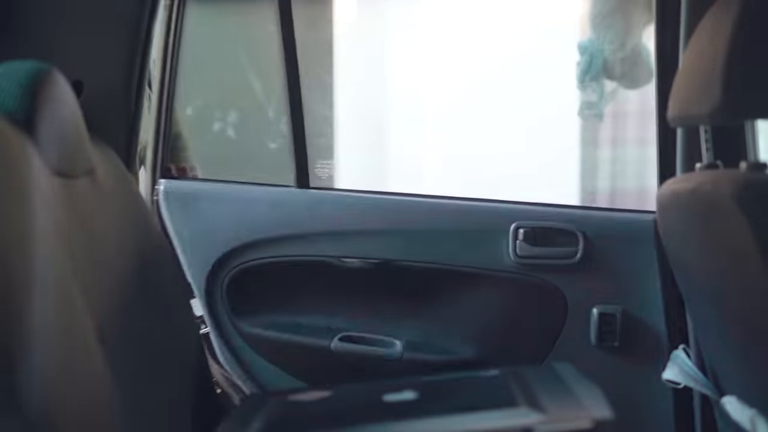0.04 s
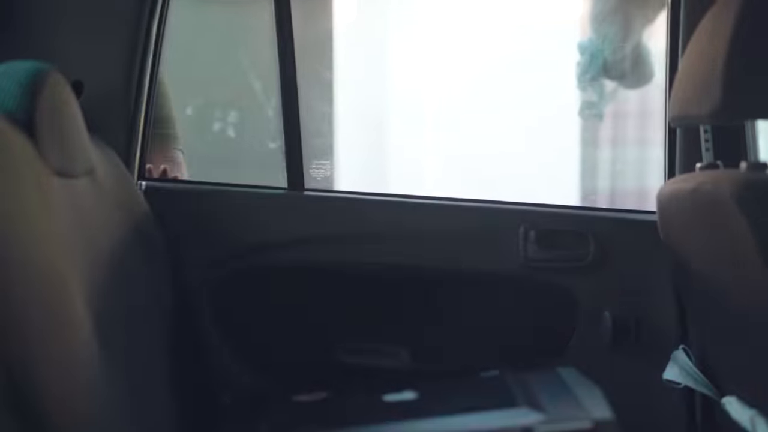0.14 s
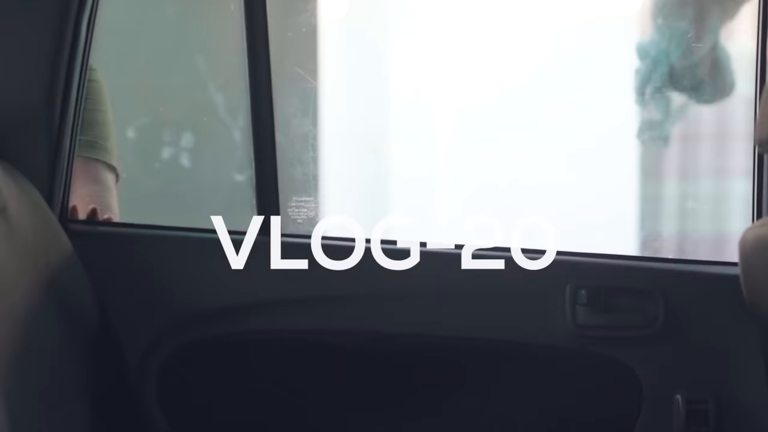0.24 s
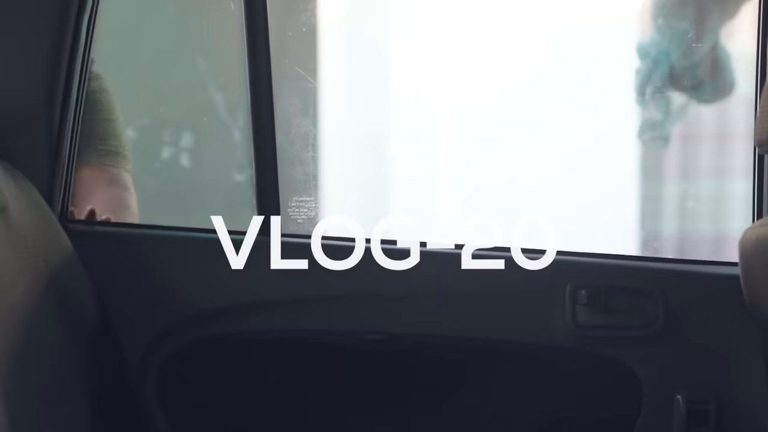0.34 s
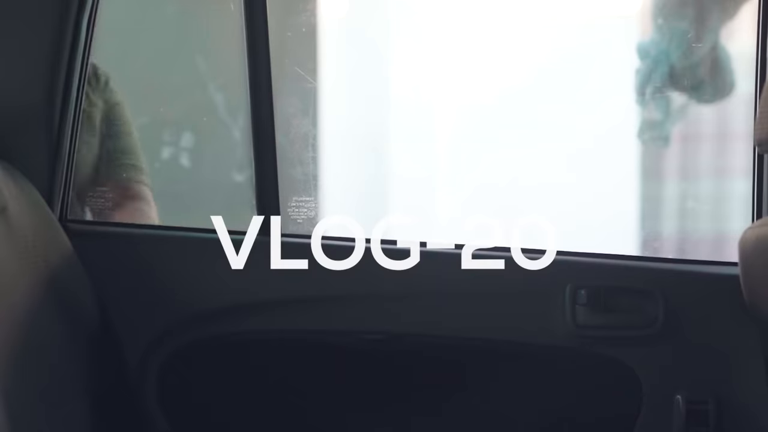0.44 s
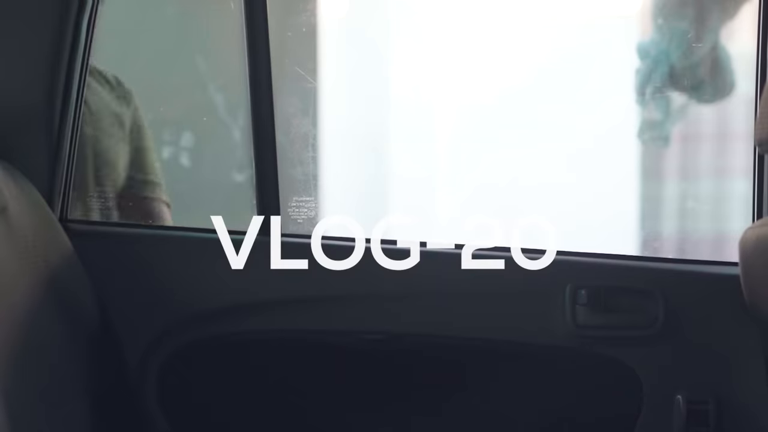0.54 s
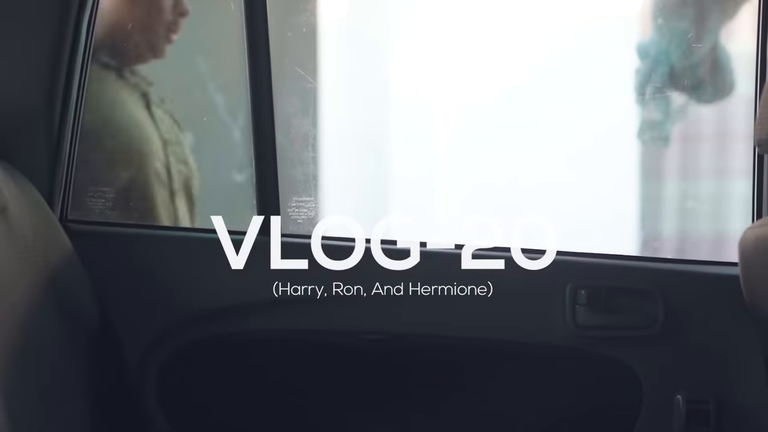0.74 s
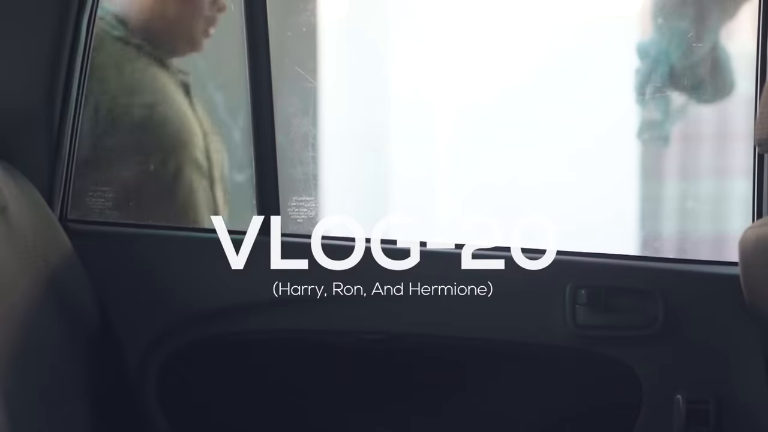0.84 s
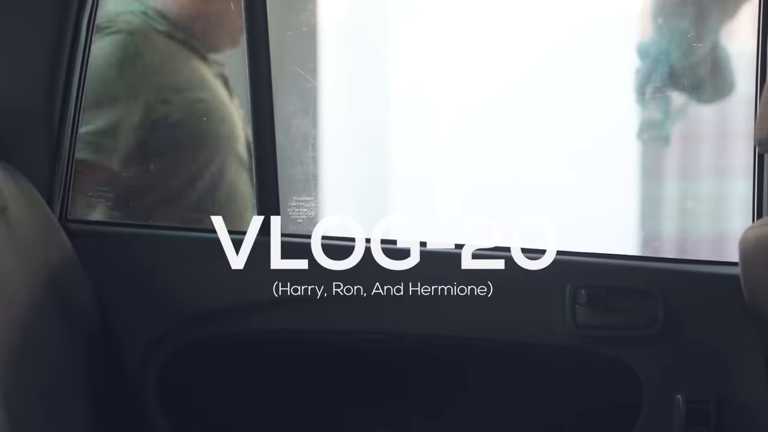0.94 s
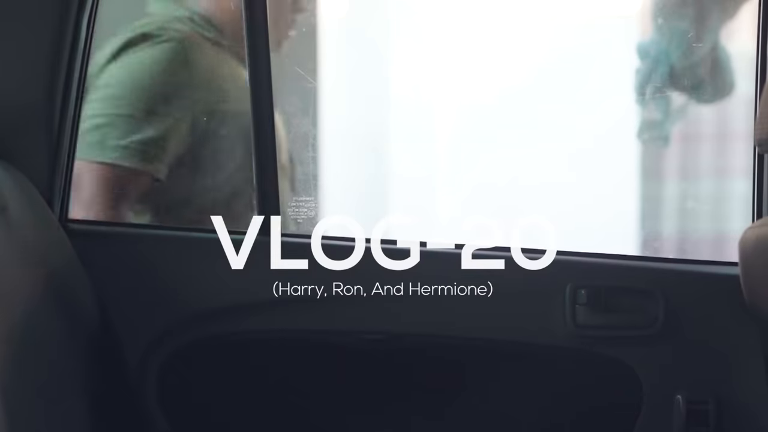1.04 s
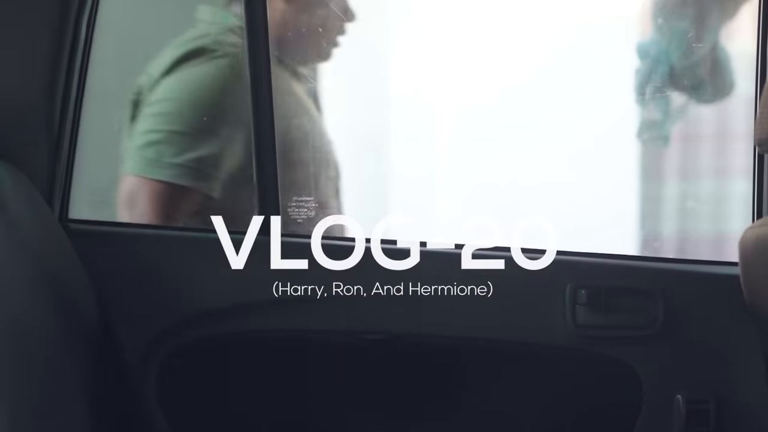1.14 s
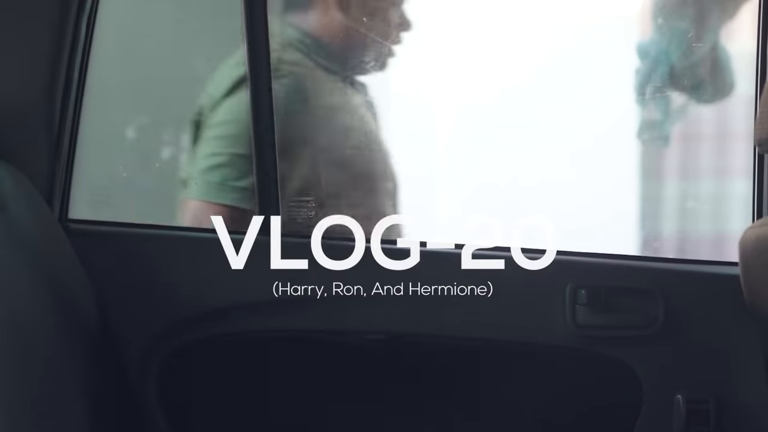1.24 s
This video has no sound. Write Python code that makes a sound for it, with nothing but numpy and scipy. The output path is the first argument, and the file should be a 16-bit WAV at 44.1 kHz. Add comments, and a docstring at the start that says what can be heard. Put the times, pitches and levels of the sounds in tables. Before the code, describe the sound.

One solid car door thud, with a metallic latch click and a short echo, is picked up by a microphone inside the cabin. Distant traffic hums quietly underneath, and a faint bird calls near the end.

```python
"""The back seat of a car parked between echoing walls, stereo microphone inside the cabin.
Close by, a rear door is pushed shut: the latch clacks, the door lands on its seal,
the panels and cabin air boom, and the walls return the slam.
Distant traffic murmurs throughout and a small bird calls near the end."""
import sys
import numpy as np
from scipy import signal
from scipy.fft import rfft, irfft
from scipy.io import wavfile
from scipy.ndimage import uniform_filter1d

SR = 44100
rng = np.random.default_rng(int(sys.argv[2]) if len(sys.argv) > 2 else 0)


def put_to_file(sound):
    """Save the sound as 16-bit audio at rate SR, in the file named by the first command-line argument."""
    columns = np.atleast_2d(sound).T  # one column per channel
    safe = np.clip(columns, -1, 1)
    whole_steps = np.round(safe * 32767)
    wavfile.write(sys.argv[1], SR, whole_steps.astype(np.int16))


N = 57330
T = np.arange(N) / SR
HZ = np.fft.rfftfreq(N, 1 / SR)


def amp(db):
    """Decibels to gain."""
    return 10 ** (np.asarray(db) / 20)


def unit_rms(x):
    """Scales to rms 1."""
    return x / np.sqrt(np.mean(x ** 2) + 1e-20)


def curve(points, hz):
    """Interpolates (Hz, value) points on a log-frequency axis."""
    point_hz, value = np.transpose(points)
    return np.interp(np.log(hz + 1), np.log(point_hz + 1), value)


def noise(colour, tilt=0):
    """Stereo noise, centred in the bass, diffuse in the treble; tilt is dB per octave above about 1 kHz."""
    # Each row: frequency in Hz, correlation between left and right.
    likeness = [(30, 1), (70, 1), (125, 1), (250, 1), (500, 0.57), (1000, 0.64), (2000, 0.11), (16000, 0)]
    same = np.clip(curve(likeness, HZ), -1, 1)
    mid, side = np.exp(2j * np.pi * rng.random((2, len(HZ))))
    mid, side = mid * np.sqrt(1 + same), side * np.sqrt(1 - same)
    gain = amp(curve(colour, HZ) + tilt * np.log2(1 + HZ / 1000))
    return unit_rms(irfft(np.array([mid + side, mid - side]) * gain, N))


def envelope(start, rise, t60):
    """A straight rise and an exponential decay, all times in seconds."""
    age = np.maximum(T - start, 0)
    return np.minimum(age / rise, 1) * np.exp(-np.log(1000) * age / t60)


def mode(start, hz, db, t60, rise, phase=0):
    """One struck resonance: a decaying sine."""
    return amp(db) * envelope(start, rise, t60) * np.sin(2 * np.pi * hz * (T - start) + phase)


def traffic():
    """Far-off traffic: a murmur and a rumble that recede, and a steady narrow drone."""
    # Each row of these three spectra: frequency in Hz, relative level in dB.
    murmur_colour = [(15, -38), (25, -1.5), (53, -4), (92, -2.5), (200, -3), (301, -18.5), (714, -6),
                     (936, -15.5), (1020, -16), (1190, -12.5), (2160, -20.5), (3080, -24), (5140, -31.5),
                     (5730, -29.5), (7310, -32.5), (8360, -32), (16000, -42)]
    rumble_colour = [(20, -23), (60, -24), (90, -0.5), (170, 1), (250, -6), (400, -10), (1000, -19),
                     (16000, -68)]
    drone_colour = [(20, -60), (560, -27), (690, -3.5), (745, 1), (790, -6), (900, -35), (16000, -90)]
    murmur_fade_db_per_s, rumble_fade_db_per_s = 2.5, 7
    murmur = amp(-42.5 - murmur_fade_db_per_s * T) * noise(murmur_colour)
    drone = amp(-53.5) * noise(drone_colour)
    rumble = amp(-43 - rumble_fade_db_per_s * T) * noise(rumble_colour)
    return murmur + drone + rumble


def faint_ring():
    """A faint high ring dies away at the start."""
    # Each row: frequency in Hz, relative level in dB.
    colour = [(20, -58.5), (5000, -21), (5800, -7), (6200, -21), (6700, -8.5), (7400, -20), (16000, -31)]
    return amp(-52) * noise(colour) * envelope(0, rise=0.0012, t60=1)


def latch():
    """The latch meets the striker, and the lock's small steel parts ring, ping and click."""
    # Each row: start in seconds, level in dB.
    strikes = [(0.2287, -32), (0.2353, -15)]
    # Each row: frequency in Hz, relative level in dB, t60 in seconds.
    latch_modes = [(1160, -1.5, 0.11), (1297, -3, 0.15), (1300, 0.5, 0.045), (2085, -5, 0.12),
                   (3805, -3.5, 0.035)]
    # Each row: start in seconds, frequency in Hz, level in dB.
    pings = [(.2512, 7660, -22), (.2768, 3800, -17), (.2915, 3650, -26)]
    # Each row: start in seconds, level before the low-pass in dB, treble tilt in dB per octave,
    # t60 in seconds, low-pass edge in Hz.
    clicks = [(0.2288, -23, -4, 0.14, 9400), (0.236, -21.5, -4, 0.3, 7300), (0.2473, -23, -8, 0.17, 18500),
              (0.25, -28, 9, 0.087, 17800), (0.2764, -19.5, -5, 0.2, 8550)]
    # Each row: frequency in Hz, relative level in dB.
    click_colour = [(100, -16), (500, -8), (1200, -11), (2500, -8), (5000, -13.5), (6800, -12), (7600, -14),
                    (9000, -12), (12000, -18), (16000, -17.5)]
    rise_s, left_delay_s = 0.0018, 0.00015
    ring = sum(mode(start, hz, db + mode_db, t60, rise=0.0015)
               for start, db in strikes for hz, mode_db, t60 in latch_modes)
    ring += sum(mode(start, hz, db, t60=0.028, rise=rise_s) for start, hz, db in pings)
    out = np.array([np.interp(T - left_delay_s, T, ring), ring])
    for start, db, tilt, t60, edge_hz in clicks:
        lowpass = signal.butter(4, edge_hz, fs=SR, output="sos")
        out += amp(db) * signal.sosfilt(lowpass, noise(click_colour, tilt)) * envelope(start, rise_s, t60)
    return out


def door_skin():
    """The sheet metal gives a short hollow knock as the door lands."""
    # Each row: frequency in Hz, relative level in dB, t60 in seconds.
    skin_modes = [(427.3, -2.5, 0.31), (551.4, -3, 0.45), (794, -1, 0.2), (927, 0.5, 0.14),
                  (1148, -4.5, 0.13)]
    start_s, level_db = 0.247, -23
    return sum(mode(start_s, hz, level_db + db, t60, rise=0.0022, phase=2 * np.pi * rng.random())
               for hz, db, t60 in skin_modes)


def seal_thud():
    """The door settles on its seal; each blow shakes many close modes, each band dying at its own speed."""
    # Each row: start in seconds, level in dB, rise in seconds, treble tilt in dB per octave.
    blows = [(0.2498, -14.5, 0.0062, -1.5), (0.271, -17, 0.013, 0), (0.3, -20.5, 0.0095, -6)]
    # Each row: frequency in Hz, relative level in dB.
    colour = [(20, -7), (45, -19), (80, -11.5), (170, 1), (260, 0), (350, -4.5), (540, -5.5), (670, -12),
              (850, -10.5), (1300, -10.5), (2100, -14.5), (3000, -22), (6500, -26.5), (10000, -31.5),
              (16000, -39)]
    # Each row: frequency in Hz, t60 in seconds.
    decay = [(40, 1.8), (170, 1.1), (400, 0.78), (800, 0.54), (2000, 0.86), (5000, 0.7), (14000, 0.4)]
    centres_hz = np.geomspace(40, 14000, 10)
    # Overlapping triangular bands that sum to one.
    bands = [curve(np.c_[centres_hz, peak], HZ) for peak in np.eye(len(centres_hz))]
    out = np.zeros((2, N))
    for start, db, rise, tilt in blows:
        shake = rfft(noise(colour, tilt))
        for hz, band in zip(centres_hz, bands):
            out += amp(db) * irfft(shake * band, N) * envelope(start, rise, curve(decay, hz))
    return out


def cabin_boom():
    """The trapped air is squeezed and sways; standing waves of panels and cabin swell over it."""
    # Each row: start in seconds, frequency in Hz, level in dB, t60 in seconds.
    air_modes = [(0.253, 41.6, -21.5, 0.85), (0.26, 62.6, -22.5, 0.9)]
    # Each row: frequency in Hz, relative level in dB, t60 in seconds.
    body_modes = [(106.9, -6, 0.42), (125.9, -3.5, 0.44), (157.1, 4, 0.47), (182.9, -2.5, 0.36),
                  (202.9, -1, 0.64), (250, -4.5, 1.106), (318.7, -6, 0.69), (374.4, -7.5, 0.66),
                  (438.3, -17, 0.53), (473, -4, 0.38), (543.3, -10, 0.68), (799, -13, 0.66),
                  (950, -17, 0.22)]
    start_s, level_db, spread_rad = 0.277, -12.5, 0.5
    out = sum(mode(start, hz, db, t60, rise=0.0057) for start, hz, db, t60 in air_modes)
    sides = spread_rad * np.array([[-1], [1]])
    for k, (hz, db, t60) in enumerate(body_modes):
        phase = sides * (-1) ** k + 2 * np.pi * rng.random()  # the leading side alternates by mode
        out = out + mode(start_s, hz, level_db + db, t60, rise=0.042, phase=phase)
    return out


def wall_echoes():
    """The walls outside return the slam, smeared into bursts of noise."""
    # Each row: start in seconds, level in dB, rise in seconds, treble tilt in dB per octave.
    echoes = [(0.35, -20.5, 0.013, -0.5), (0.406, -26, 0.021, 0.04), (.48, -37, 0.043, 1),
              (0.634, -38.5, 0.014, -.5), (.797, -40, 0.013, -0.5)]
    # Each row: frequency in Hz, relative level in dB.
    colour = [(40, -17), (100, 7.5), (240, 5), (310, 0.5), (420, -1.5), (600, -0.5), (1500, -7),
              (3000, -12), (6500, -17), (10000, -22), (16000, -35.5)]
    return sum(amp(db) * noise(colour, tilt) * envelope(start, rise, t60=0.67)
               for start, db, rise, tilt in echoes)


def bird():
    """A small bird's wavering whistles glide and level off, blurred by the walls."""
    # Each row: start and length in seconds, first and last pitch in Hz, relative level in dB.
    notes = [(1.064, 0.076, 2950, 3084, -49), (1.081, 0.0675, 3160, 3294, -38.5),
             (1.123, .1, 3875, 3800, -37), (1.228, 0.06, 6350, 4020, -39.5),
             (1.262, .04, 5680, 3860, -36.5)]
    # Each row: harmonic number, level against the fundamental in dB.
    overtones = [(2, -22), (3, -23)]
    waver_depth, glide_power, bright_above_hz, direct_gain = 0.0151, 1.8, 3600, 0.32
    song = np.zeros(N)
    for start, length, from_hz, to_hz, db in notes:
        progress = np.clip((T - start) / length, 0, 1)
        glide_hz = to_hz + (from_hz - to_hz) * (1 - progress) ** glide_power
        waver = unit_rms(uniform_filter1d(rng.standard_normal(N), size=100))
        phase = 2 * np.pi * np.cumsum(glide_hz * (1 + waver_depth * waver)) / SR
        whistle = np.sin(phase)
        if to_hz > bright_above_hz:
            whistle += sum(amp(overtone_db) * np.sin(k * phase) for k, overtone_db in overtones)
        song += amp(db) * np.sqrt(4 * progress * (1 - progress)) * whistle
    tail = unit_rms(rng.standard_normal((2, N)) * envelope(0, rise=0.005, t60=0.73)) / np.sqrt(N)
    return direct_gain * song + signal.fftconvolve(song[None], tail, axes=1)[:, :N]


def scene():
    """From the back seat: the slam close by, a hair to the right, with the street beyond."""
    pan_db = 0.2
    slam = latch() + door_skin() + seal_thud() + cabin_boom() + wall_echoes()
    return slam * amp([[-pan_db / 2], [pan_db / 2]]) + traffic() + faint_ring() + bird()


def record(dry):
    """The recorder cuts off the treble above 16 kHz."""
    lowpass = signal.firwin(511, 16000, window=("kaiser", 9), fs=SR)
    return signal.oaconvolve(dry, lowpass[None], "same")


dry = scene()
out = record(dry)
put_to_file(out)
```